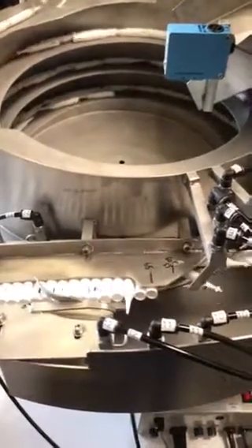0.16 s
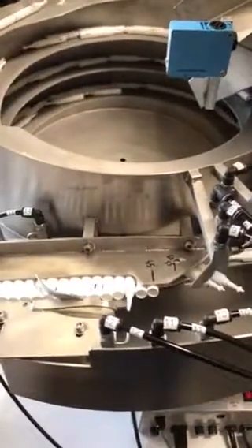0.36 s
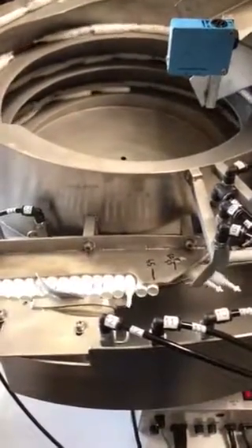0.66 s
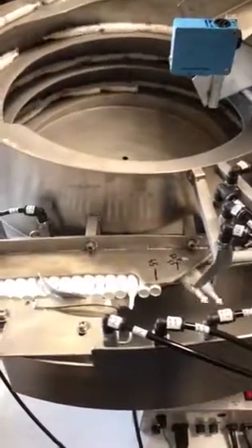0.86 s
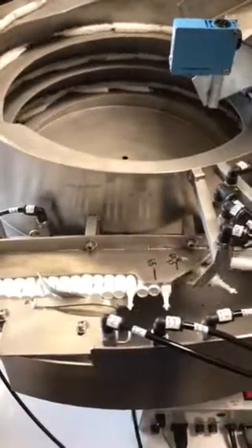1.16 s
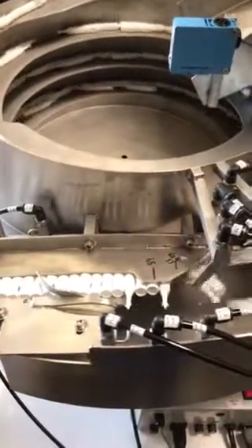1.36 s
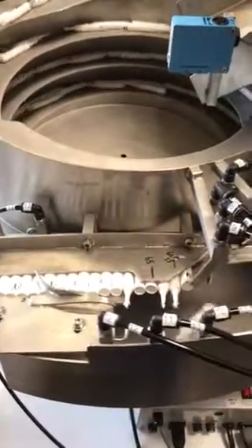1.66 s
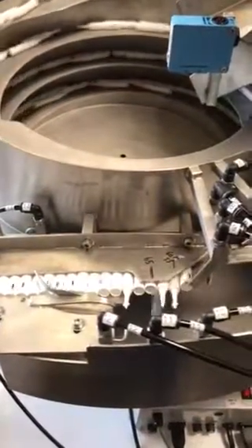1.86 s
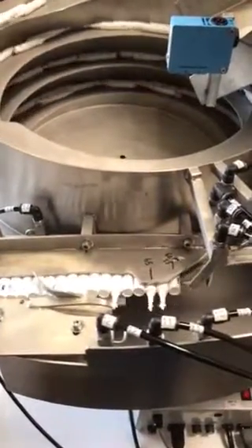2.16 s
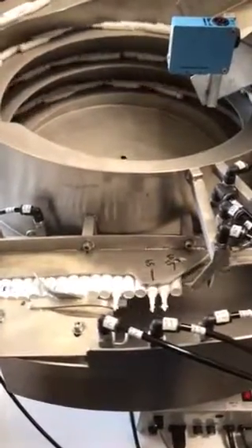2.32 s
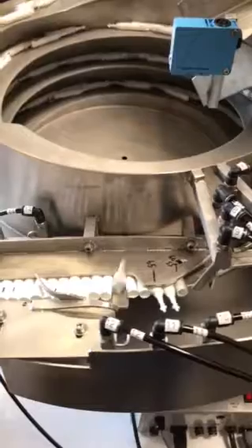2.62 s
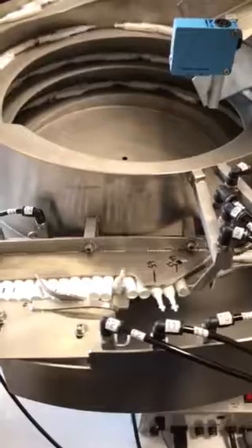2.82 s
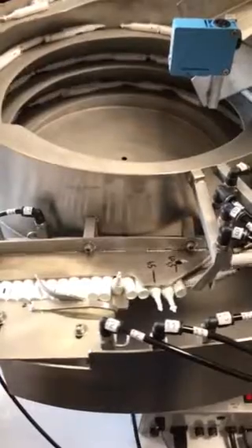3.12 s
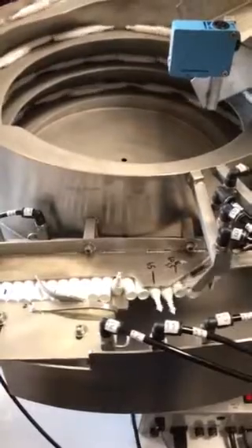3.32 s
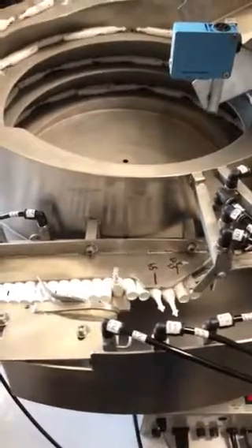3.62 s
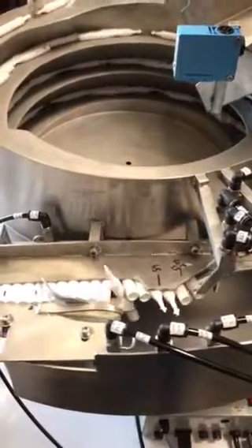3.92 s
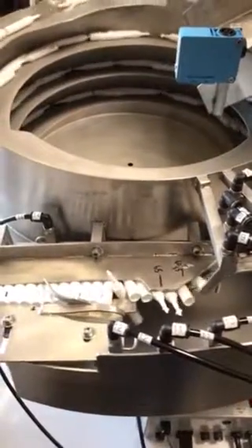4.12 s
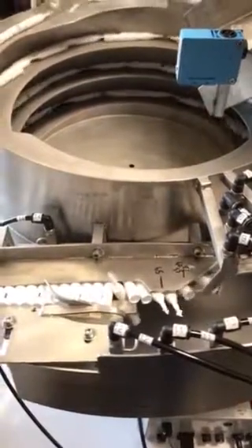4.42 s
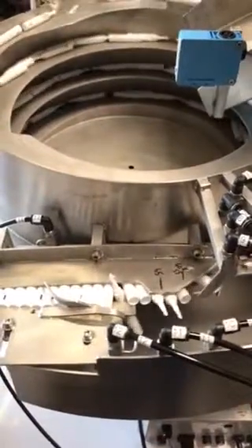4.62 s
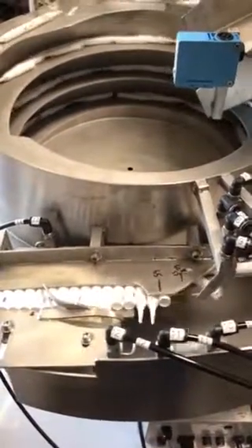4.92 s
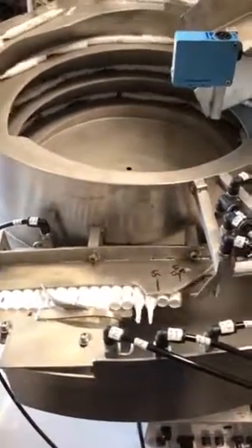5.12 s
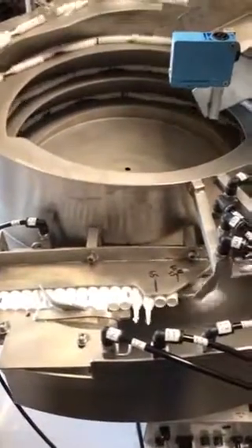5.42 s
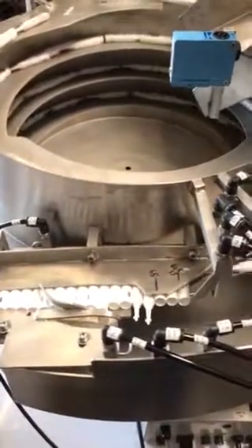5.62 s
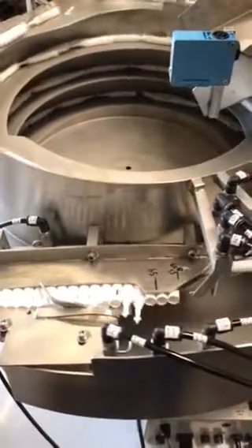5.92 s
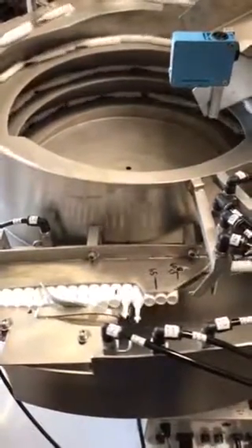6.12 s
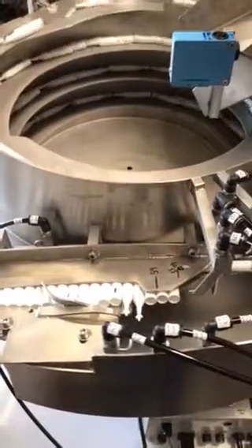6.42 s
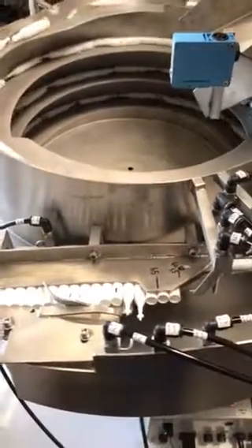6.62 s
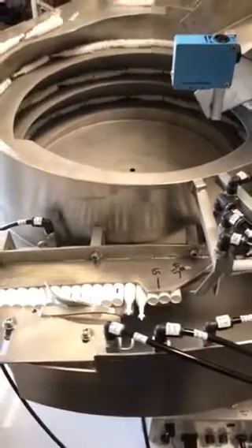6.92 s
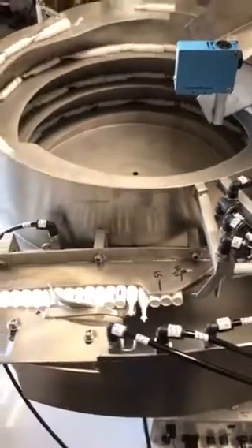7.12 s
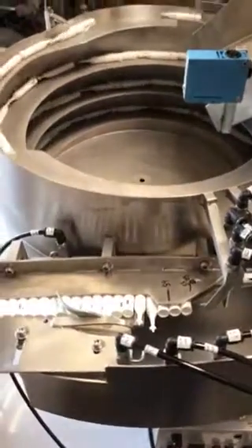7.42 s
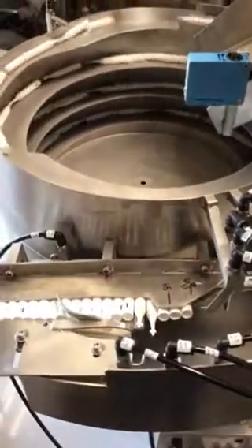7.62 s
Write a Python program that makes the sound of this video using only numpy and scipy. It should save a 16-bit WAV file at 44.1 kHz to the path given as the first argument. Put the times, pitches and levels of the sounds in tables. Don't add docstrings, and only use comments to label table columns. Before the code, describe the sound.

Steady low electrical hum and fine metallic chatter beneath a strong air hiss, with brief pipe-like whistles and occasional tumbling clatter in a workshop.

```python
import sys
import numpy as np
from scipy import signal
from scipy.fft import rfft, irfft, next_fast_len
from scipy.io import wavfile
from scipy.ndimage import uniform_filter1d, map_coordinates

SR = 44100
rng = np.random.default_rng(int(sys.argv[2]) if len(sys.argv) > 2 else 0)


def materialize(psi):
    bounded = np.clip(np.atleast_2d(psi).T, -1, 1)
    quanta = np.round(bounded * 32767).astype(np.int16)
    wavfile.write(sys.argv[1], SR, quanta)


def to_linear_factor(level_db):
    exponent = np.asarray(level_db, float) / 20
    return 10 ** exponent


N = 342657
MAINS_HZ = 60.028
CATCH_S, LEAVE_S = 0.0051, 0.011

# t/s, share [0-1]
TRACK_FILL = [(0, 0.24), (1.4, 0), (1.9, 0.26), (3.2, 0.23), (3.4, .1), (4.84, 0.16), (4.92, 0.37),
              (5.7, 0.85), (6.3, 0.7), (7.77, 0.93)]
# t/s, length/s, swell/dB, overblown towards the third mode/dB
BLOWN_TUBES = [(.01, .06, 5, 1), (1, .08, 3, -1), (1.485, .025, 10, -3), (1.515, .03, 5, 5),
               (1.8, .06, -1, 4), (1.98, 0.033, 2, 4), (2.56, 0.056, 2, -7), (2.685, 0.045, 5, -1),
               (3.385, 0.72, 4, 2.5), (3.42, .04, 3, -3), (3.72, .15, -0.5, 1), (4.065, .055, 1.5, 4),
               (4.275, .1, 3.5, 4), (4.39, .065, 4, 3), (5.16, 0.025, 2, 5), (5.46, 0.055, 4, -1.5),
               (5.84, .06, 2, 3.5), (7.39, 0.027, 10.5, -6)]
# t/s, length/s, level/dB
SWING_INS = [(1.513, .05, -33.5), (1.793, .05, -37), (3.381, 0.044, -28.5), (4.285, 0.089, -36),
             (5.16, 0.021, -37), (5.518, .03, -32), (7.4, 0.035, -37)]


def unit(x):
    return x / np.sqrt(np.mean(x ** 2) + 1e-20)


def curves(rows):
    s, *columns = np.transpose(rows)
    return [np.interp(np.arange(N) / SR, s, column) for column in columns]


def held(rows, attack_s, release_s):
    t = np.arange(N) / SR
    total = 0
    for start, length, *values in rows:
        rise = (t - start) / attack_s
        fall = 1 + (start + length - t) / release_s
        total = total + np.outer(values, np.clip(np.minimum(rise, fall), 0, 1))
    return total


def wobble(rate):
    knots = rng.standard_normal(int(N * rate / SR) + 4)
    return map_coordinates(knots, [np.arange(N) * rate / SR])


def filtered(x, response):
    size = next_fast_len(len(x) + 8192)
    return irfft(rfft(x, size) * response(np.fft.rfftfreq(size, 1 / SR)), size)[:len(x)]


def colour(points):
    f, db = np.transpose(points)
    return lambda hz: to_linear_factor(np.interp(np.log(hz + 1), np.log(f), db))


def resonance(hz, centre, width, db):
    return to_linear_factor(db) * 1j * hz * width / (centre ** 2 - hz ** 2 + 1j * hz * width)


def modes(table):
    return lambda hz: sum((-1) ** k * resonance(hz, *row) for k, row in enumerate(table))


def humps(table):
    return lambda hz: np.sqrt(sum(np.abs(resonance(hz, *row)) ** 2 for row in table))


def turbulence(patchy_db):
    z = signal.stft(rng.standard_normal(N), nperseg=512)[2]
    field = uniform_filter1d(rng.standard_normal(z.shape), size=6, axis=0)
    field = uniform_filter1d(field, size=8, axis=1)
    return signal.istft(z * to_linear_factor(patchy_db * unit(field)), nperseg=512)[1][:N]


def tones(orders, lag, unsteady_db):
    stroke = MAINS_HZ * np.arange(N) / SR + 0.0976
    total = 0
    for multiple, db, polarity in orders:
        gain = polarity * to_linear_factor(db + unsteady_db * wobble(6)) * np.sqrt(2)
        total = total + gain * np.cos(2 * np.pi * (multiple * stroke - lag))
    return total


def magnet():
    # t/s, overtone level/dB
    hum_overtones = [(0, -34), (.6, -34), (.78, -31), (1.6, -30.5), (2, -30.5), (2.12, -33.5), (2.55, -31.5),
                     (2.8, -32.5), (7.77, -33)]
    # multiple of the mains rate, level/dB, polarity
    coil = [(2, -8.5, 0.99), (3, 0.5, 1), (4, -12.5, -0.91)]
    frame = [(5, -0.5, 0.96)]
    base = [(6, -0.5, 0.98), (10, -12.5, 1), (12, -17.5, 1), (18, -12, 0.94)]
    bowl = [(7, -0.5, -0.95), (9, -14.5, -0.67), (13, -15, 1), (14, -5, -0.77), (17, -5, -0.92)]
    # t/s, length/s, frame/dB, base/dB, bowl/dB
    load_shifts = [
        (.3, 0.24, 7, -1, 2),
        (.64, .16, 9, -4.5, -6),
        (.84, 0.19, 1, -6, -4),
        (2.45, .15, 8, 0, 1),
    ]
    coil_db, = curves(hum_overtones)
    stroke_db = -20.0 + 0.22 * (coil_db + 32.5)
    hum = to_linear_factor(stroke_db) * tones([(1, 0, 1)], lag=0, unsteady_db=0.2)
    hum = hum + to_linear_factor(coil_db) * tones(coil, lag=0.35, unsteady_db=0.24)
    shift_db = held(load_shifts, attack_s=0.037, release_s=0.037)
    for part, rest_db, change_db in zip((frame, base, bowl), (-47.5, -37, -39.5), shift_db):
        hum = hum + to_linear_factor(rest_db + change_db) * tones(part, lag=0.68, unsteady_db=1.86)
    return hum


def crowding():
    # t/s, level/dB
    falls = [
        (.76, 0),
        (1.49, 2.5),
        (1.525, 6),
        (3.43, 2),
        (4.07, 1),
        (6.58, 3),
        (6.9, 7),
    ]
    tumble_s = 0.023
    tumbles, = held([(s, tumble_s, db) for s, db in falls], CATCH_S, tumble_s)
    packed, = curves(TRACK_FILL)
    swell_db = held(BLOWN_TUBES, CATCH_S, LEAVE_S)[0]
    return -33.5 - 4.5 * packed + .45 * swell_db + tumbles + .8 * wobble(9)


def chatter(count, bunched):
    # f/Hz, width/Hz, level/dB
    steel = [(1990, 750, -7.5), (2670, 490, -2), (3100, 480, 0), (4170, 580, 1.5), (5420, 530, -3.5),
             (7990, 860, -4.5)]
    hop, spread, force = rng.random((count, 3)).T
    stroke_number = np.floor(hop * N / SR * MAINS_HZ)
    landing = stroke_number + .04 + bunched * np.log(spread / (1 - spread))
    place = np.round(landing / MAINS_HZ * SR).astype(int) % N
    taps = np.bincount(place, 2 * force - 1, N)
    return to_linear_factor(crowding() + 2.0) * unit(filtered(taps, modes(steel)))


def near_steel(x):
    # delay/s, level/dB
    walls = [(.00213, -21), (.00337, -20), (.00461, -21), (.00629, -22), (.00871, -23), (.01253, -24)]
    return filtered(x, lambda hz: 1 + sum(to_linear_factor(db) * np.exp(-2j * np.pi * hz * s) for s, db in walls))


def air():
    # t/s, level/dB
    exposed = [(0, -6), (.4, -3), (1, -1), (1.35, -4), (2, -1), (2.65, 2), (3.2, 1), (4, 1.5), (4.75, -1),
               (5.1, 2), (6.3, -3), (7.77, -4)]
    (exposed_db,), (packed,) = curves(exposed), curves(TRACK_FILL)
    swell_db, over_db = held(BLOWN_TUBES, CATCH_S, LEAVE_S)
    splits = [(s, length, 1 + (db + 36.5) / 6) for s, length, db in SWING_INS]
    splash_db = 3 * held(splits, .004, LEAVE_S)[0]
    rock_rate, rock_db = 22, 2.2
    loose = np.clip(1 - .09 * swell_db, .3, 1)
    shared = wobble(rock_rate)

    def rock(share):
        return loose * share * rock_db * (0.43 * shared + 0.7 * wobble(rock_rate))

    first_db = -32 + exposed_db + swell_db + rock(1)
    third_db = -34 + 0.33 * exposed_db + swell_db + over_db + rock(0.59)
    upper_db = -36 + 9 * packed + .2 * (swell_db + over_db) + splash_db * (1 - 0.61 * packed) + rock(0.46)
    jet_db = -29 + 0.36 * packed + 0.25 * splash_db + 0.28 * wobble(4.08)
    return first_db, third_db, upper_db, jet_db


def pipe(multiple, width_hz, steady):
    # t/s, f/Hz
    seating = [
        (0, 1238),
        (1.45, 1240),
        (1.5, 1258),
        (1.9, 1263),
        (3.35, 1265),
        (3.5, 1259),
        (4.45, 1260),
        (4.6, 1245),
        (5.6, 1240),
        (7.77, 1238),
    ]

    def drift():
        return filtered(rng.standard_normal(N), lambda hz: 1 / (1 + (2 * hz / width_hz) ** 2))

    breath = drift() + 1j * drift()
    turns = np.cumsum(multiple * curves(seating)[0]) / SR
    return unit(np.real(breath / np.abs(breath) ** steady * np.exp(2j * np.pi * turns)))


def jets():
    # f/Hz, width/Hz, level/dB
    queue_first = [(1160, 77, -0.5), (1380, 75, 1.5), (1460, 190, -2), (1540, 510, -7.5)]
    queue_third = [(3610, 74, -4), (3860, 190, -5)]
    queue_upper = [(4440, 136, -1.5), (5390, 210, -5), (6070, 134, 1), (6700, 250, -21), (7274, 220, 0.5),
                   (8400, 200, -9), (9330, 380, -3), (12000, 770, -8)]
    # f/Hz, level/dB per Hz
    open_jet = [(500, -53), (1500, -17), (2200, -7.5), (3300, 0), (4900, -5), (6600, 0.5), (7800, -7),
                (8800, -0.5), (9900, -0.5), (10400, -6), (11000, 0), (13000, -0.5), (14500, -1.5),
                (15600, -3.5)]

    def queue(table):
        return unit(filtered(turbulence(patchy_db=1.1), humps(table)))

    first_db, third_db, upper_db, jet_db = air()
    flutter_db = .5 * wobble(25)
    first = to_linear_factor(-38 + 0.94 * (first_db + 32)) * pipe(1, width_hz=45, steady=.5)
    first += to_linear_factor(-37.5 + 0.85 * (first_db + 32)) * queue(queue_first)
    third = to_linear_factor(-40 + 1.42 * (third_db + 33)) * pipe(3, width_hz=90, steady=.5)
    third += to_linear_factor(-38.5 + 0.8 * (third_db + 34.5)) * queue(queue_third)
    upper = to_linear_factor(upper_db + 1.0 + flutter_db) * queue(queue_upper)
    hiss = unit(filtered(turbulence(patchy_db=1.2), colour(open_jet)))
    hiss = to_linear_factor(jet_db + 4.0 + 0.08 * wobble(19)) * hiss
    return to_linear_factor(flutter_db) * (first + third) + near_steel(upper + hiss)


def arrivals():
    t = np.arange(N) / SR
    swell = np.zeros(N)
    for start, length, db in SWING_INS:
        onset = np.clip((t - start) / .004, 0, 1)
        ending = np.clip((start + length - t) / .01 + 1, 0, 1)
        swell += to_linear_factor(db - 2.7 * np.abs(t - start) / length) * onset * ending
    fifth = pipe(4.87, width_hz=66, steady=0.37)
    seventh = pipe(7.4, width_hz=260, steady=.3)
    return swell * (fifth + to_linear_factor(-0.5) * seventh)


def workshop():
    # f/Hz, level/dB rms
    far_machine = [
        (269.5, -55.5),
        (317, -57),
    ]
    # f/Hz, level/dB per Hz
    hall = [(20, -5), (60, 4.5), (110, -4.5), (260, -6.5), (340, 3.5), (390, -4), (480, -0.5), (740, -3),
            (920, 2.5), (1300, -1.5), (1900, -9.5), (3000, -22), (6000, -60)]
    t = np.arange(N) / SR
    drone = unit(filtered(turbulence(patchy_db=0.55), colour(hall)))
    total = to_linear_factor(-34.5 + 0.73 * wobble(7) + 3.0) * drone
    for hz, db in far_machine:
        total += to_linear_factor(db + 1.9 * wobble(5.2)) * np.sqrt(2) * np.sin(2 * np.pi * hz * t)
    return total


def scene():
    track = jets() + arrivals() + near_steel(chatter(count=20000, bunched=.14))
    return np.tile(magnet() + track + workshop(), (2, 1))


def low_pass(x):
    return signal.sosfilt(signal.butter(12, 16610, fs=SR, output="sos"), x)


def record(dry):
    flickers = [.324, .742, .812, .812, 1.067, 1.067, 1.462, 1.903, 2.066, 2.182, 2.553, 2.553, 2.832,
                2.878, 2.878, 4.202, 4.806, 4.806, 4.806, 4.991, 5.224, 6.083, 7.615, 7.615]
    size = 2048
    window = signal.windows.kaiser_bessel_derived(size, 4 * np.pi)
    side = np.zeros(N + 2 * size)
    for s, (place, scatter) in zip(flickers, rng.random((len(flickers), 2))):
        low_hz = 4400 + place * (14200 - 4400)
        high_hz = low_hz + 1600
        db = -39.5 + 6 * (scatter - .5)
        noise = filtered(rng.standard_normal(size), lambda hz: (hz > low_hz) & (hz < high_hz))
        start = round(s * SR) + size // 2
        side[start:][:size] += to_linear_factor(db + 3.0) * unit(noise) * window ** 2
    side = side[size:size + N]
    mid = filtered(dry.mean(axis=0), lambda hz: hz < 15725)
    return low_pass(np.array([mid + side, mid - side]))


dry = scene()
out = record(dry)
materialize(out)
```